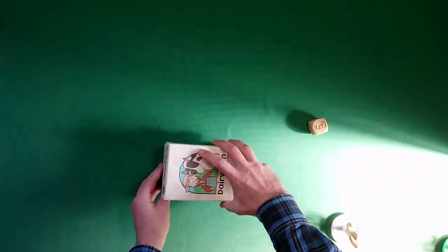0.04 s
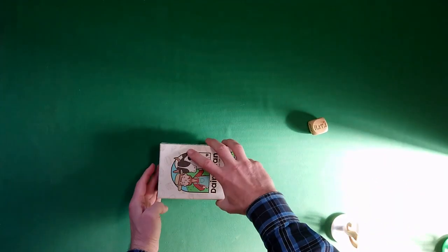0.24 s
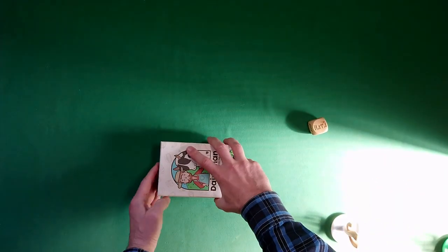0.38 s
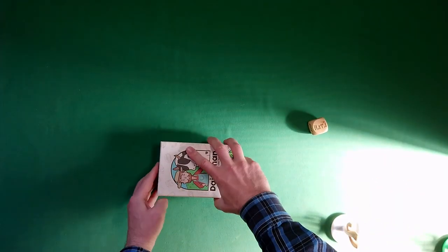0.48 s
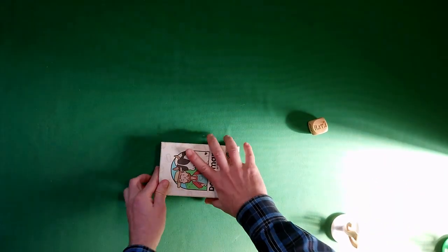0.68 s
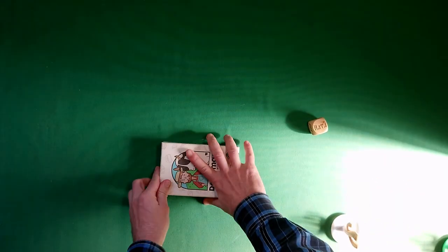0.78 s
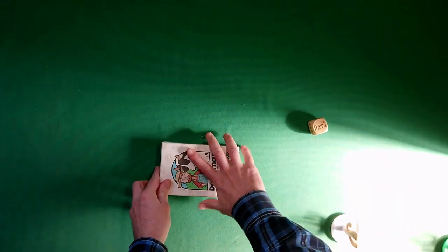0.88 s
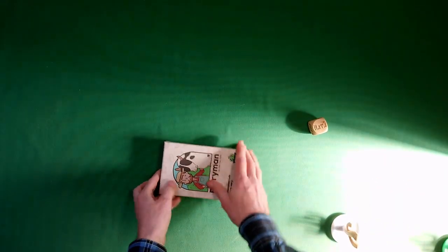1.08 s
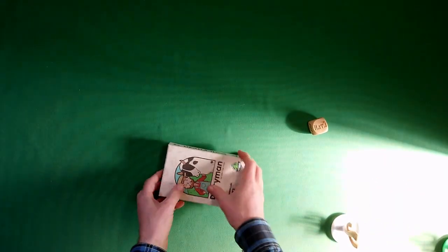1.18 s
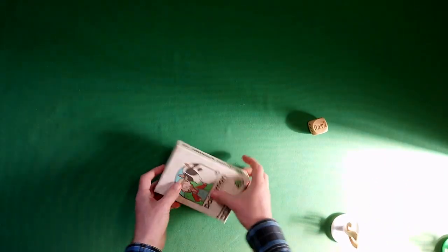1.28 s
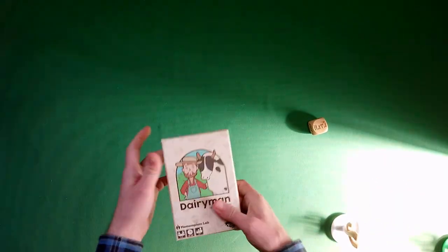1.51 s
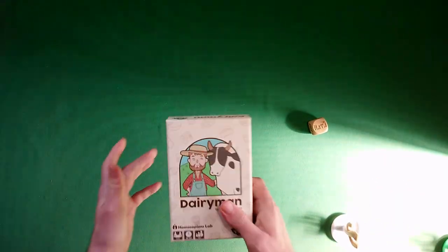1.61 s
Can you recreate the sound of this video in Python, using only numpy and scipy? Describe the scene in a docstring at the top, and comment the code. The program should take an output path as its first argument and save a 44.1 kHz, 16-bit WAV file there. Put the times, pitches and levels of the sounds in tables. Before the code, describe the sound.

Small cardboard box handled on a cloth-covered table: faint taps, one loud hollow knock, soft sliding, then lid edges snapping shut with dull thumps, and taps and scrapes as it turns; close stereo microphones, small quiet room.

```python
"""Hands close and turn a small cardboard box on a cloth-covered table in a small quiet room.
Fingers rub the card and the cloth hisses, both as streams of random slips; early lid taps and a
loud knock ring the modes of the box walls. The box slides and thumps the modes of the table top,
the lid's edges snap home, further thumps follow and it is turned over with taps and scrapes.
Two spaced microphones hear it direct and through a room of sparse echoes, over steady room tone."""
import sys
import numpy as np
from scipy import signal
from scipy.fft import rfft, irfft, next_fast_len
from scipy.io import wavfile

SR = 44100
rng = np.random.default_rng(int(sys.argv[2]) if len(sys.argv) > 2 else 0)


def boost_factor(decibels):
    """Convert a level in decibels to a linear amplitude factor."""
    exponent = np.asarray(decibels, float) / 20
    return 10 ** exponent


def int16_out(signal):
    """Quantize to a 16-bit WAV file."""
    q = np.round(np.clip(np.atleast_2d(signal).T, -1, 1) * 32767)
    wavfile.write(sys.argv[1], SR, q.astype(np.int16))


N = 72765  # length in samples

# Modes of the box walls. Each row: pitch in Hz, relative level in dB, free ringing time t60 in seconds.
BOX_MODES = [(307.3, -3, 0.11), (400, 4.5, 0.053), (485.4, 2.5, 0.048), (570.6, -10, 0.13),
             (683.6, -12.5, 0.11), (741.5, -3, 0.048), (1001, -5, 0.042), (1150, -11.5, 0.048),
             (1362, -8.5, 0.057), (1652, -4, 0.047), (1998, -6.5, 0.14), (2231, -4, 0.076),
             (2790, -8, 0.0083)]
# Modes of the table top. Each row: pitch in Hz, relative level in dB, free ringing time t60 in seconds.
TABLE_MODES = [(66, 11.5, 0.09), (82.8, -2.5, 0.33), (116.2, 6.5, 0.078), (152, 3, 0.093), (190, -1, 0.13),
               (263, -2, 0.05), (305, 8.5, 0.036)]
# Taps on the box. Each row: start in seconds, level in dB, pitch in Hz of the walls it moves most.
BOX_TAPS = [(.0655, -25.5, 585), (.0692, -21.5, 480), (.0935, -24, 550), (.119, -37, 584), (.180, -33, 627),
            (.192, -25, 443), (.2166, -6.5, 750), (.2218, -5.5, 345), (.257, -18, 710), (.272, -23.5, 630),
            (.300, -27, 474), (.358, -31.5, 384), (.735, -25, 445), (1.179, -38, 750), (1.189, -31, 395),
            (1.238, -32, 1150), (1.302, -25.5, 1020), (1.312, -24.5, 1400), (1.332, -17.5, 1505),
            (1.348, -31, 835), (1.38, -26.5, 463), (1.394, -24, 535), (1.398, -36, 465), (1.477, -35, 1680),
            (1.481, -34.5, 1640), (1.484, -42, 417)]
# Lid edges snapping home. Each row: start in seconds, level in dB, pitch in Hz of the walls moved most.
LID_SNAPS = [(.7668, -17, 950), (.7708, -13, 850), (.7754, -17, 650)]
BOX_RISE_S = 0.0005  # onset of taps and snaps
SAME_SLIPS = 0.16  # share of the slips' power that both capsules hear alike


def evened(x):
    """Scales to rms 1."""
    return x / np.sqrt(np.mean(x ** 2) + 1e-20)


def read(points, hz):
    """Reads a spectrum on a log-frequency axis."""
    f, value = np.transpose(points)
    return np.interp(np.log(hz + 1), np.log(f + 1), value)


def curves(rows):
    """Joins control rows into one value per sample, one curve per column after the time."""
    rows = np.array(rows)
    t = np.arange(N) / SR
    return [np.interp(t, rows[:, 0], column) for column in rows.T[1:]]


def add(mix, start_s, sound):
    """Mixes a sound in at its start time."""
    part = mix[round(start_s * SR):][:len(sound)]
    part += sound[:len(part)]


def low_cut(x, hz, order):
    """Butterworth high-pass."""
    return signal.sosfilt(signal.butter(order, hz, "high", fs=SR, output="sos"), x)


def colour(x, points):
    """Filters by a spectrum in dB."""
    size = next_fast_len(N + 8192)
    gain = boost_factor(read(points, np.fft.rfftfreq(size, 1 / SR)))
    return irfft(rfft(x, size) * gain, size)[..., :N]


def share(hz, centre_hz, reach):
    """How much a touch centred on one pitch moves a mode; reach in octaves, over a -32 dB floor."""
    octaves = np.log2(hz / centre_hz)
    return np.exp(-.5 * (octaves / reach) ** 2) + boost_factor(-32)


def grains(per_s, spread_db, same):
    """Random slips of uneven size and sign over a surface, so each side hears partly other ones."""
    size_db = spread_db * np.minimum(rng.exponential(1, (3, N)), 4)
    size = boost_factor(size_db) * rng.choice([-1., 1.], (3, N))
    slips = size * (rng.random((3, N)) < per_s / SR)  # left, right and common stream
    return evened(np.sqrt(same) * slips[2] + np.sqrt(1 - same) * slips[:2])


def rubbed(modes, slips, damping, centre_hz, reach):
    """A stream of slips rings the modes, whose free decay is sped up by the damping; rms near 1."""
    out, power, t = 0, 0, np.arange(4000) / SR
    for hz, db, t60 in modes:
        gain = boost_factor(db) * share(hz, centre_hz, reach)
        decay = boost_factor(-60 * t * damping / t60)
        ring = decay * np.sin(2 * np.pi * hz * t) * (1 - np.exp(-t * hz))
        ringing = signal.oaconvolve(slips, ring[None], axes=1)[:, :N]
        out = out + gain * evened(ringing)
        power = power + gain ** 2
    return out / np.sqrt(power)


def blows(rows, modes, rise_s, reach, late_damping):
    """Each blow rings the modes near its pitch, slightly detuned; late ones decay at another speed."""
    out, t = np.zeros(N), np.arange(SR // 4) / SR
    hz, db, t60 = np.transpose(modes)[:, :, None]
    detune = 1 + 0.016 * rng.standard_normal((len(rows), len(modes), 1))
    for (start_s, level_db, centre_hz), d in zip(rows, detune):
        damping = late_damping if start_s > 0.74 else 1
        decay = boost_factor(db - 60 * t * damping / t60)
        ring = share(hz, centre_hz, reach) * decay * np.sin(2 * np.pi * hz * d * t)
        ring = ring.sum(0) * (1 - np.exp(-t / rise_s))
        add(out, start_s, boost_factor(level_db) * ring / abs(ring).max())
    return out


def dry_bursts(rows, bright_db):
    """Short decaying noise bursts in the colour of card; bright_db tilts them per octave."""
    # Spectrum of a tick. Each row: frequency in Hz, gain in dB before the tilt.
    card_colour = [(250, -47.5), (500, 12), (2000, 16), (7000, -4.5), (14000, -17)]
    out, t = np.zeros(N), np.arange(1000) / SR
    for (start_s, level_db), noise in zip(rows, rng.standard_normal((len(rows), len(t)))):
        add(out, start_s, boost_factor(level_db) * noise * np.exp(-t / 0.007))  # decay constant in seconds
    return colour(out, [(hz, db + bright_db * np.log2(hz / 2000)) for hz, db in card_colour])


def rub():
    """Fingers and lid rub the box: many small slips ring the walls, damped by the hands."""
    # Rubbing strokes. Each row: time in seconds, level in dB, pitch in Hz of the walls rubbed most.
    strokes = [(0, -35, 910), (.05, -51, 930), (.11, -40.5, 610), (.165, -47.5, 600), (.25, -22.5, 720),
               (.33, -50.5, 860), (.7, -41.5, 1040), (.77, -36, 805), (.86, -58, 574), (1.08, -60, 910),
               (1.095, -44.5, 2380), (1.15, -55, 900), (1.19, -45.5, 600), (1.28, -59, 780),
               (1.305, -32.5, 1050), (1.33, -45, 1470), (1.336, -28, 1470), (1.37, -30, 1190),
               (1.41, -36.5, 970), (1.43, -45, 870), (1.568, -79, 1180), (1.574, -39, 2500),
               (1.63, -55, 2500), (1.65, -34, 2380)]
    level_db, centre_hz = curves(strokes)
    slips = grains(per_s=1500, spread_db=4.5, same=SAME_SLIPS)
    walls = rubbed(BOX_MODES, slips, 2.2, centre_hz, reach=0.85)
    return boost_factor(level_db) * low_cut(walls, 370, 6)


def slide():
    """Fibres catch and let go; quick strokes on cloth hiss brighter than card on card."""
    # Box and sleeves sliding on cloth. Each row: time in seconds, hiss level in dB.
    hiss_levels = [(0, -43), (.15, -57.5), (.22, -39.5), (.28, -76), (.357, -49.5), (.42, -50.5),
                   (.46, -62), (.53, -48.5), (.65, -46), (.72, -33), (.78, -34), (.83, -60.5), (.98, -70.5),
                   (1.095, -52), (1.29, -54), (1.31, -42), (1.329, -50), (1.335, -37.5), (1.37, -50),
                   (1.395, -36), (1.45, -58), (1.565, -71.5), (1.6, -45), (1.65, -77)]
    # Spectrum of the cloth. Each row: frequency in Hz, gain in dB before the brightness tilt.
    cloth = [(600, -37), (1300, -8), (2200, -7), (4000, -8), (8000, -12), (10500, -20), (15700, -19.5)]
    # Brightness of the hiss. Each row: time in seconds, tilt in dB per octave.
    bright = [(0, -4), (.22, -5.5), (.5, -6.5), (.75, 1), (1.25, -3.5), (1.33, -6.5), (1.6, -9.5)]
    fibres = grains(per_s=6700, spread_db=5, same=SAME_SLIPS)
    hz, t, z = signal.stft(colour(fibres, cloth), SR, nperseg=256)
    octaves = np.log2((hz[:, None] + 100) / 5000)
    z = z * boost_factor(octaves * np.interp(t, *np.transpose(bright)))
    hiss = signal.istft(z, SR, nperseg=256)[1][:, :N]
    return boost_factor(curves(hiss_levels)[0]) * evened(hiss)


def weight():
    """Weight of box and hands shifts on the table: slips ring the table top, mostly alike on both sides."""
    # Shifting weight. Each row: time in seconds, level in dB.
    weight_levels = [(0, -42.5), (.14, -45), (.3, -38), (.55, -43.5), (.75, -32.5), (1.0, -51), (1.1, -39),
                     (1.3, -43), (1.4, -54.5), (1.65, -68)]
    shifts = grains(per_s=400, spread_db=1.8, same=0.93)
    return boost_factor(curves(weight_levels)[0]) * rubbed(TABLE_MODES, shifts, 1.41, 136.7, reach=1.0)


def hush():
    """Steady room tone from shaped noise, its likeness between the channels set by frequency."""
    # Spectrum of the room tone. Each row: frequency in Hz, relative level in dB per Hz.
    tone_colour = [(35, -53), (70, -10.5), (120, -13), (200, -45), (400, -1), (1000, -20.5), (2500, -25),
                   (9000, -34), (15700, -47.5)]
    # Likeness of the two channels. Each row: frequency in Hz, correlation from 0 to 1.
    likeness = [(100, 0.53), (500, 1), (1500, 0.047)]
    hz = np.fft.rfftfreq(N, 1 / SR)
    a, b = rfft(rng.standard_normal((2, N))) * boost_factor(read(tone_colour, hz))
    same = read(likeness, hz)
    right = same * a + np.sqrt(1 - same ** 2) * b
    return boost_factor(-56) * evened(irfft(np.array([a, right]), N))


def thumps():
    """Soft-onset blows into the table ring its low modes."""
    # Thumps. Each row: start in seconds, level in dB, pitch in Hz it moves most.
    thump_rows = [(.003, -31, 74.6), (.219, -19, 190), (0.591, -29.5, 125), (.658, -20.5, 114),
                  (0.731, -19.5, 116), (0.786, -20, 93), (0.854, -27, 101), (0.92, -33.5, 205),
                  (1.045, -26.5, 157), (1.057, -19, 157), (1.086, -40, 152), (1.188, -20, 247),
                  (1.2, -22, 121)]
    return blows(thump_rows, TABLE_MODES, rise_s=0.0025, reach=0.41, late_damping=0.95)


def taps():
    """Taps ring the box walls, shorter once it is gripped; their sound carries little bass."""
    rings = blows(BOX_TAPS, BOX_MODES, BOX_RISE_S, reach=0.17, late_damping=2.25)
    return low_cut(rings, 210, 4)


def clicks():
    """Each tap and snap also has a dull, dry tick, set 22 dB down before its colour."""
    rows = [(start_s, db - 22) for start_s, db, hz in [*BOX_TAPS, *LID_SNAPS]]
    return dry_bursts(rows, bright_db=-7)


def edge_ticks():
    """Dry ticks of card edges, as short noise bursts."""
    # Ticks. Each row: start in seconds, level in dB before the card's colour.
    tick_rows = [(.357, -44.5), (0.84, -45.5), (1.185, -47), (1.311, -55), (1.334, -63), (1.392, -41.5)]
    return dry_bursts(tick_rows, bright_db=0)


def snaps():
    """The lid's edges snap home: short knocks moving walls over a wide range of pitch."""
    return blows(LID_SNAPS, BOX_MODES, BOX_RISE_S, reach=0.8, late_damping=7)


def microphones(x):
    """The right capsule hears the box later; each has its own balance."""
    # Balance of the capsules. Each row: frequency in Hz, left minus right in dB.
    balance = [(60, -4.5), (400, -2), (750, -6), (2400, -5), (8000, 6), (15000, 0)]
    right_late_s = 0.000305
    size = next_fast_len(N + 8192)
    hz = np.fft.rfftfreq(size, 1 / SR)
    left = boost_factor(read(balance, hz) / 2)
    right = np.exp(-2j * np.pi * hz * right_late_s) / left
    return irfft(rfft(x, size) * np.array([left, right]), size)[:, :N]


def room(x):
    """Sparse reflections of random sign, each band dying at its own speed, different per channel."""
    # Decay of the room. Each row: frequency in Hz, t60 in seconds.
    decay_times = [(150, 0.25), (700, 0.19), (5000, 0.29)]
    # Colour of the reflections. Each row: frequency in Hz, gain in dB.
    echo_colour = [(150, -24), (350, -15), (600, -3), (10000, -5)]
    echoes = np.zeros((2, SR // 2))
    grid = np.arange(120, SR // 2 - 20, 20)
    at = grid + rng.integers(0, 20, (2, len(grid)))  # one echo in every 20 samples
    np.put_along_axis(echoes, at, rng.choice([-1., 1.], at.shape), 1)
    hz, t, z = signal.stft(echoes, SR, nperseg=256)
    t60 = read(decay_times, hz)[:, None]
    z = z * boost_factor(-60 * t / t60) / np.sqrt(t60 * 145)  # longer decays start softer
    tail = signal.istft(z, SR, nperseg=256)[1]
    return signal.fftconvolve(colour(x, echo_colour), tail, axes=1)[:, :N]


def scene():
    """Box, table and cloth, heard direct and through the room."""
    near = rub() + slide() + weight()
    near += thumps() + taps() + clicks() + edge_ticks() + snaps()
    return microphones(near) + room(near) + hush()


def roll_off(x):
    """The treble ends steeply here."""
    return signal.sosfilt(signal.butter(12, 15770, fs=SR, output="sos"), x)


def record(dry):
    """Cuts the rumble below 58 Hz and returns the finished mix."""
    mix = low_cut(dry, 58, 4)
    return roll_off(mix)


dry = scene()
out = record(dry)
int16_out(out)
```